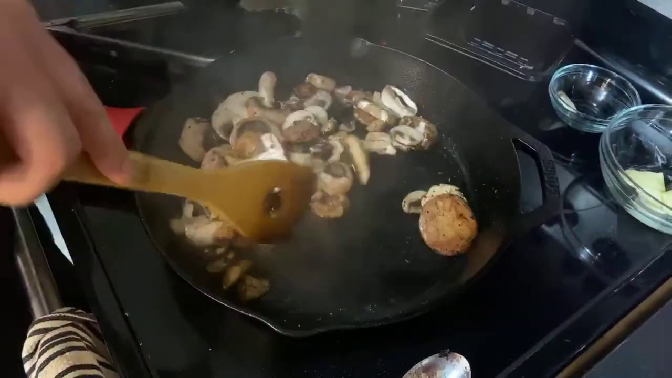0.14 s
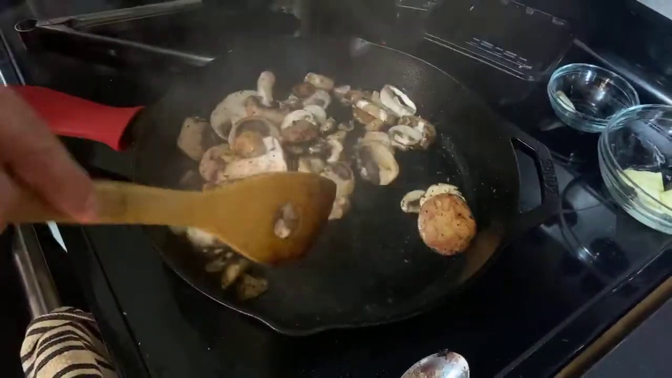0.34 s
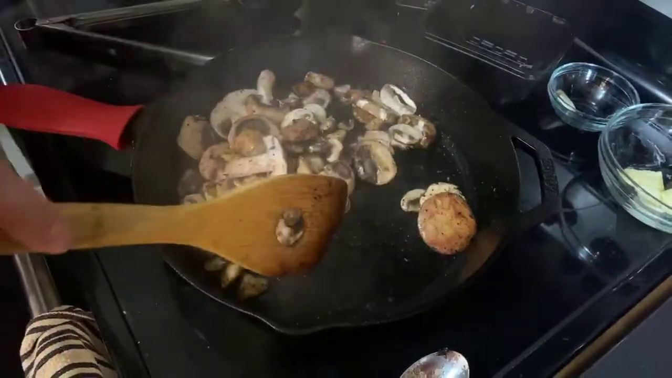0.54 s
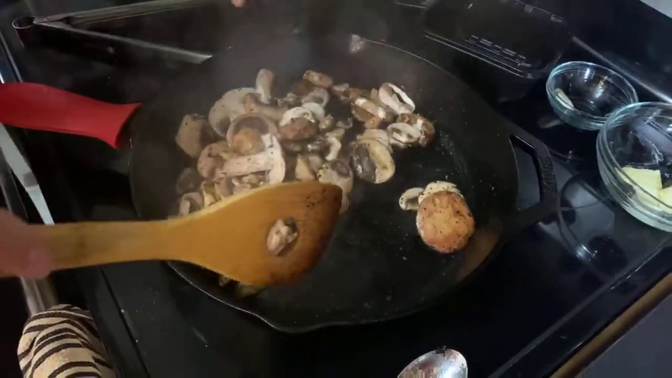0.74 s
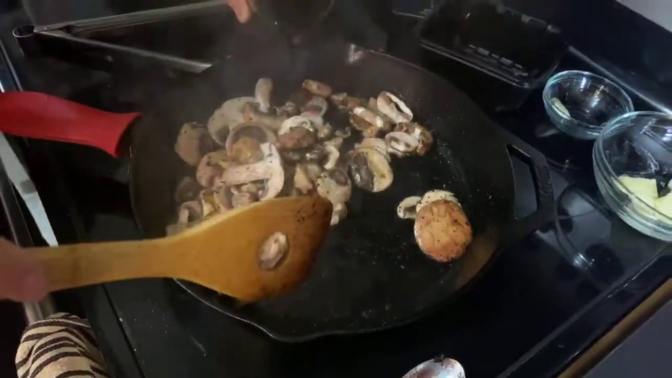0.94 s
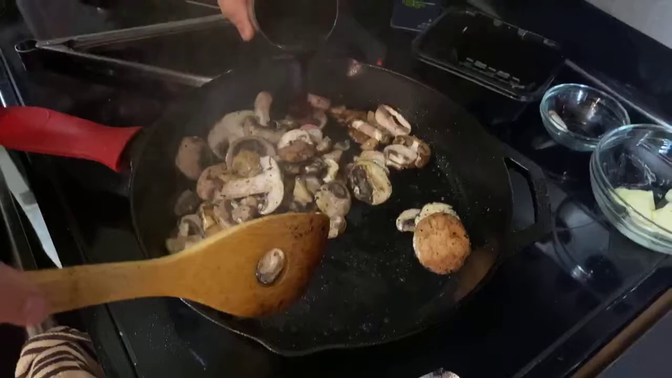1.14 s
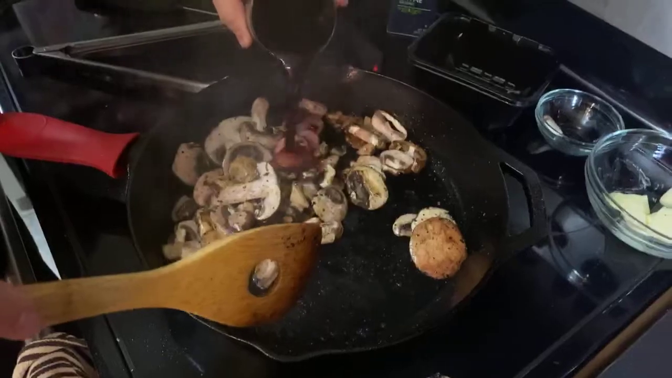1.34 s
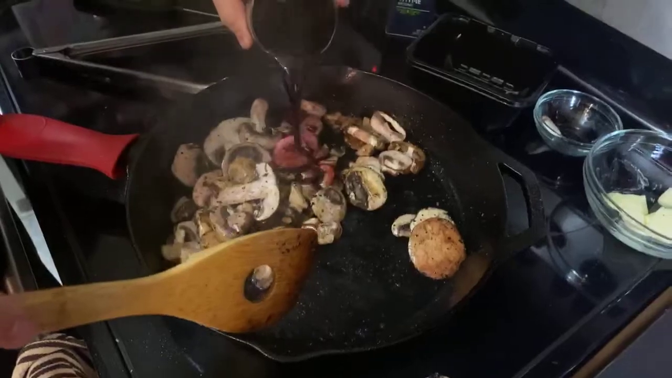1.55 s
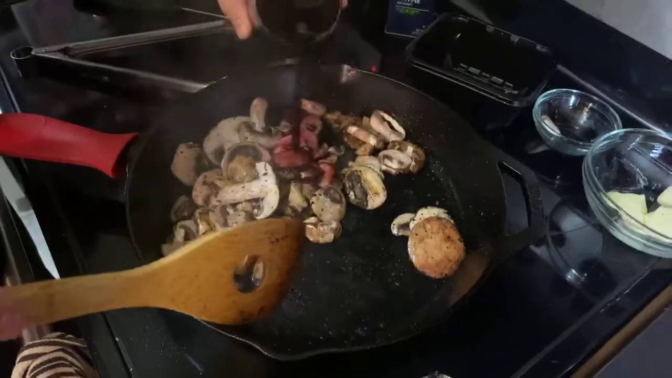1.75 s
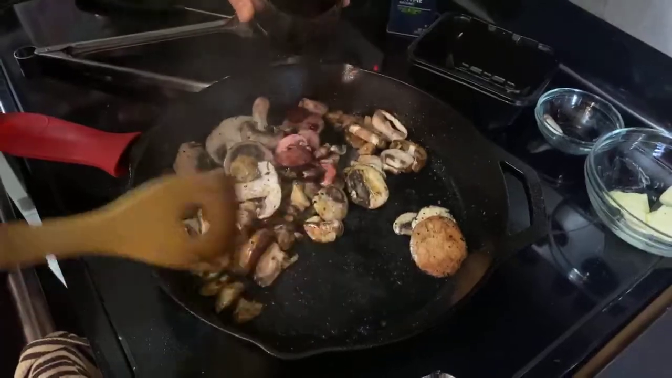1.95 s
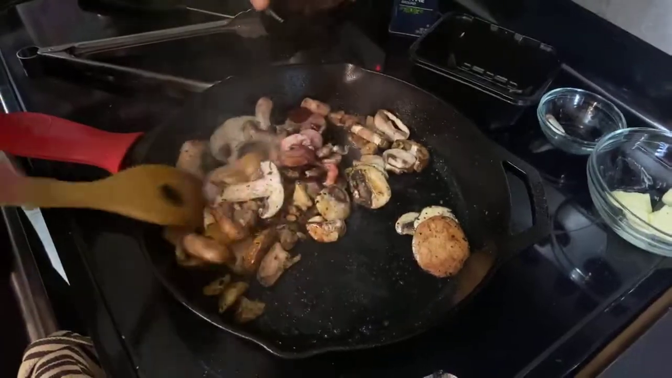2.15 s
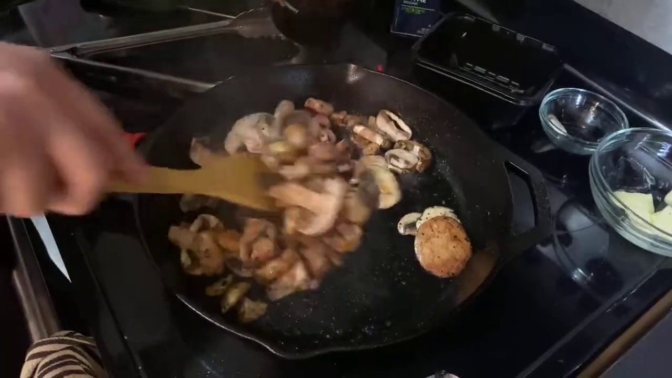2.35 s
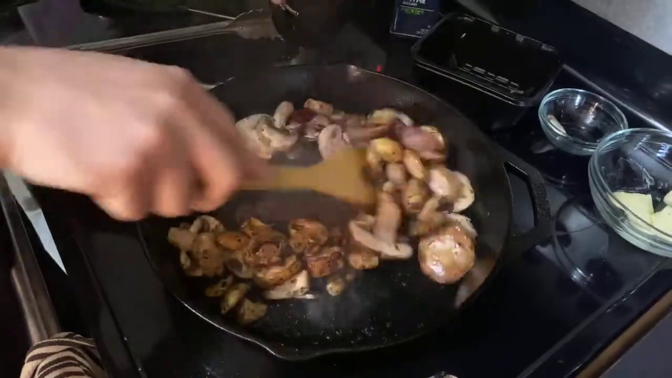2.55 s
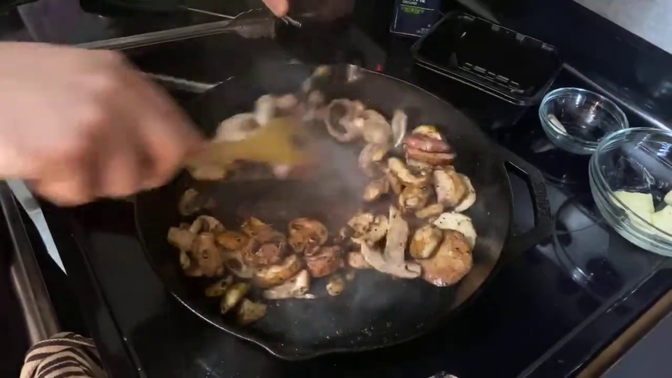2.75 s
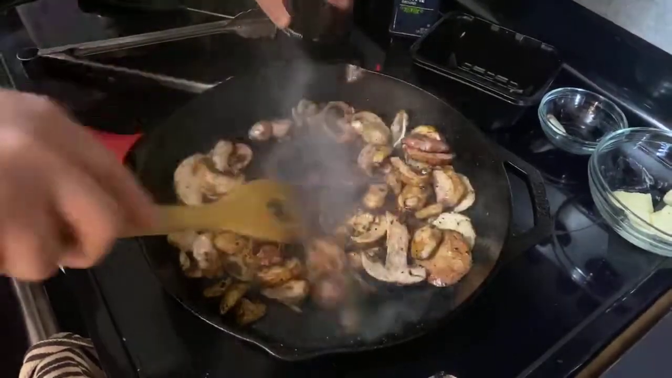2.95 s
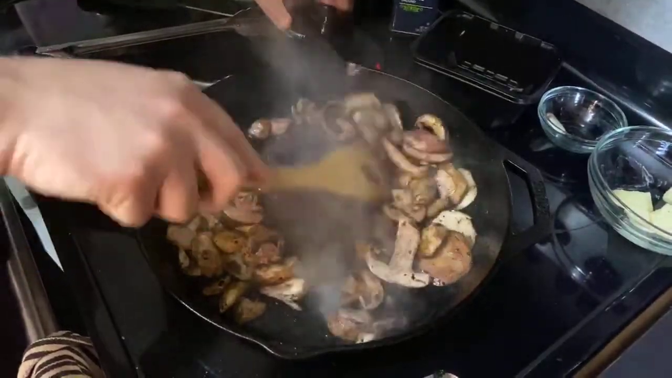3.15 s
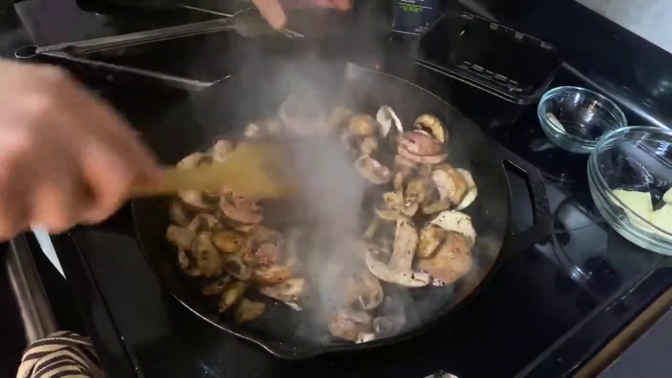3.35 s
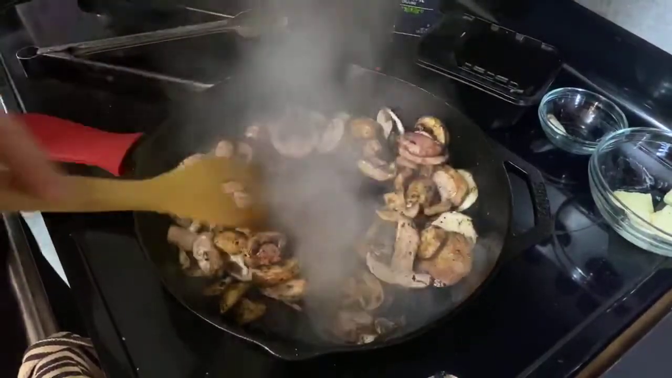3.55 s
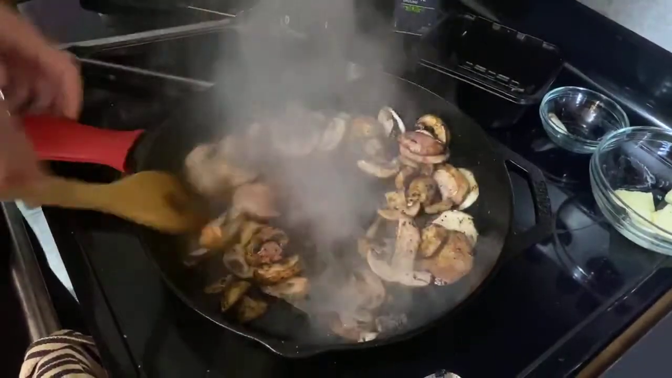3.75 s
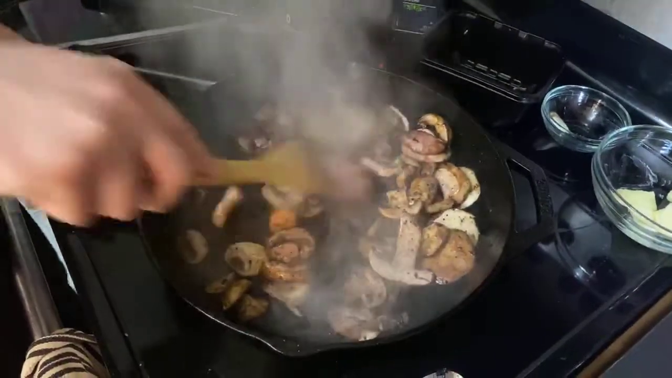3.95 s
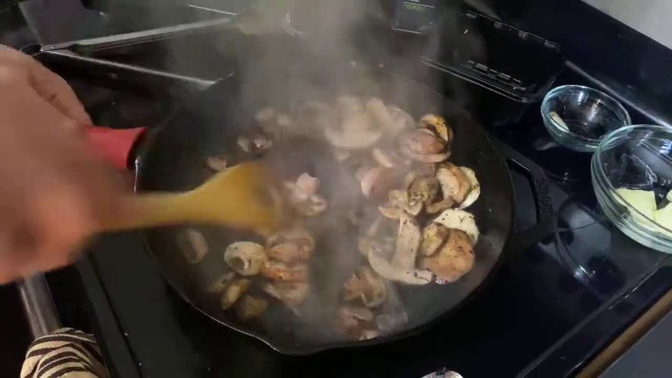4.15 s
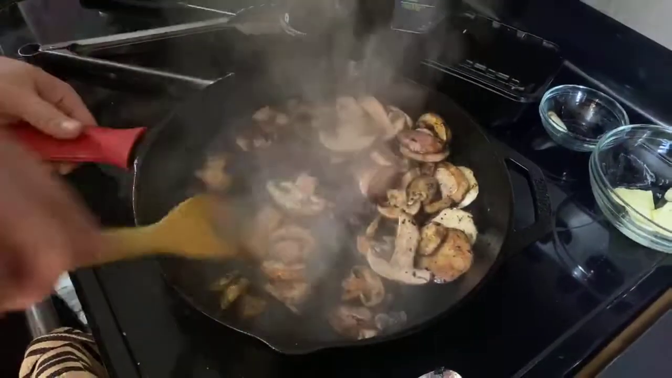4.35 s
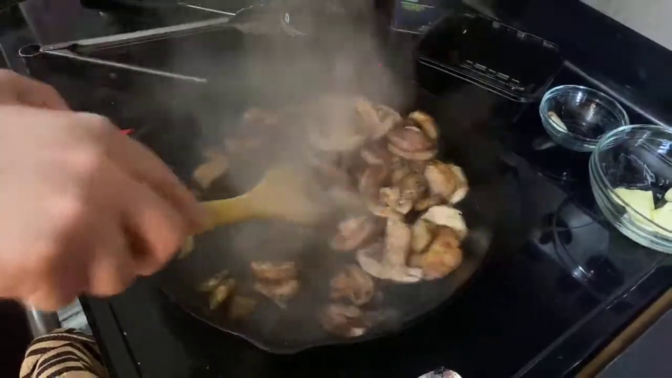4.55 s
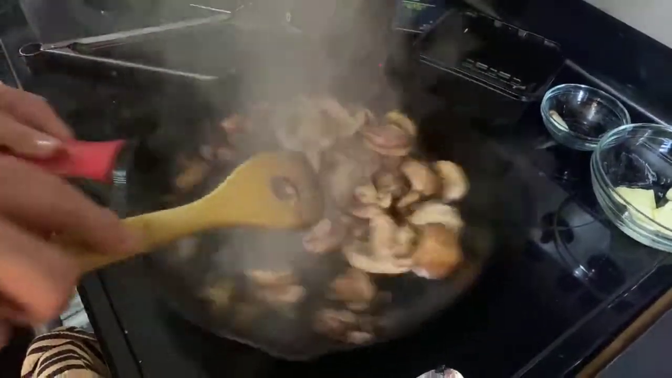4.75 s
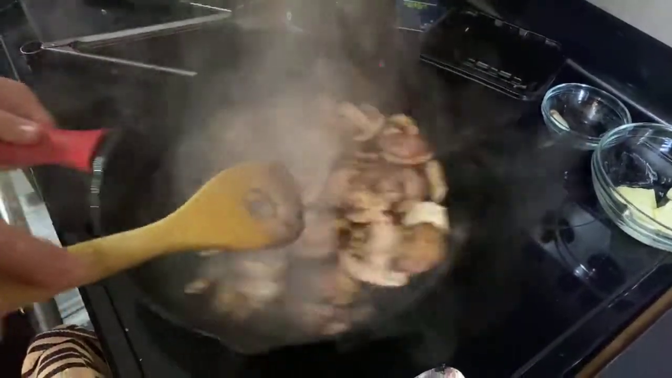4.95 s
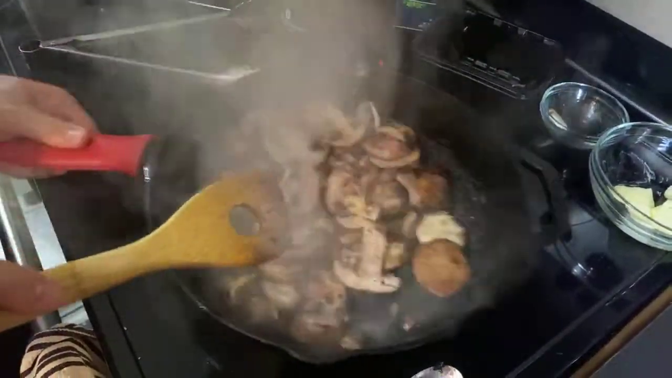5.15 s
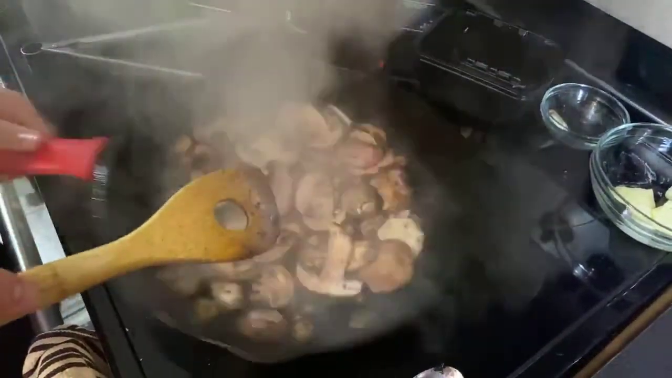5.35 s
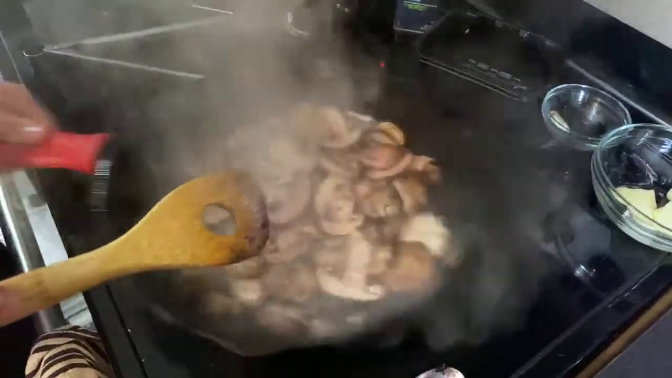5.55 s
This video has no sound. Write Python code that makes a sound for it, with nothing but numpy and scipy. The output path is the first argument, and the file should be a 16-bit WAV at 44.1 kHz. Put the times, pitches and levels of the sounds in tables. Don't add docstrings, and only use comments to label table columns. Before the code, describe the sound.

A quiet, steady fry begins with tiny crackles and hiss, eases slightly, then fills with bubbling liquid from about one and a half seconds. Stirring adds low scraping and wet slosh. A heavy pan knock with a short ring and rattle stands far above the sizzle midway, followed by smaller wooden taps. Close phone microphone in a hard-surfaced kitchen, short dull reflections, slightly thinned treble.

```python
import sys
import numpy as np
from scipy import signal
from scipy.fft import rfft, irfft, next_fast_len
from scipy.io import wavfile
from scipy.ndimage import uniform_filter1d, minimum_filter1d, map_coordinates

SR = 44100
rng = np.random.default_rng(int(sys.argv[2]) if len(sys.argv) > 2 else 0)


def magnitude_from_level(level_db):
    exponent = np.asarray(level_db, float) / 20
    return 10 ** exponent


def dump(signal):
    limited = np.clip(np.atleast_2d(signal).T, -1, 1)
    pcm = np.round(limited * 32767).astype(np.int16)
    wavfile.write(sys.argv[1], SR, pcm)


N = 247401
FRAME = 1024


def unit(x):
    return x / np.sqrt(np.mean(x ** 2) + 1e-20)


def curves(rows):
    s, *cols = np.transpose(rows)
    return [np.interp(np.arange(N) / SR, s, c) for c in cols]


def wobble(rate):
    knots = rng.standard_normal(int(N * rate / SR) + 4)
    return map_coordinates(knots, [np.arange(N) * rate / SR])


def band(x, order, low_hz, high_hz):
    return signal.sosfilt(signal.butter(order, [low_hz, high_hz], "bandpass", fs=SR, output="sos"), x)


def coloured(x, spectrum):
    m, edge = next_fast_len(N + 8 * FRAME), 2 * FRAME
    fade = np.interp(np.arange(N + 2 * edge), [0, edge, N + edge, N + 2 * edge], [0, 1, 1, 0])
    z = rfft(np.pad(x, edge, "reflect") * fade, m)
    flat = z / np.sqrt(np.abs(uniform_filter1d(np.abs(z) ** 2, size=900)) + 1e-12)
    hz, db = np.transpose(spectrum)
    log_hz = np.log(np.fft.rfftfreq(m, 1 / SR) + 1)
    gain = magnitude_from_level(np.interp(log_hz, np.log(hz), db, left=-120, right=-120))
    return unit(irfft(flat * gain, m)[edge:edge + N])


def steam(patchy_db):
    z = signal.stft(rng.standard_normal(N + FRAME), nperseg=512)[2]
    patches = uniform_filter1d(rng.standard_normal(z.shape), size=5, axis=0)
    patches = uniform_filter1d(patches, size=10, axis=1)
    return unit(signal.istft(z * magnitude_from_level(patchy_db * unit(patches)), nperseg=512)[1][:N])


def bubbles(low_hz, high_hz, cycles, rise, spread_db, count, size):
    when, pitch, bigness, life = rng.random((count, 4)).T[:, :, None]
    t = np.arange(size) / SR
    turns = low_hz * (high_hz / low_hz) ** pitch * t
    age = turns / (cycles * (0.54 + 0.43 * life))
    shape = (1 - np.exp(-age / 0.27)) * np.exp(-2.5 * age) * np.hanning(2 * size)[size:]
    tone = np.sin(2 * np.pi * turns * (1 + rise * age))
    pops = magnitude_from_level(-spread_db * np.log(1.002 - bigness)) * shape * tone
    at = (when * N).astype(int) + np.arange(size)
    return unit(np.bincount(at.ravel(), pops.ravel(), N + size)[:N])


def boil(pops, spectrum, pop_db, patchy_db):
    even_pops = coloured(pops, [(20, 0), (20000, 0)])
    return coloured(magnitude_from_level(pop_db) * even_pops + steam(patchy_db), spectrum)


# frequency in Hz, level in dB per Hz.
LARGE = [(600, -27), (850, -10.5), (1150, -0.5), (1400, -3), (1750, -1), (2100, -3.5), (2600, -49.5)]
MIDDLE = [(1400, -42.5), (1800, -8), (2050, -3.5), (2380, 0), (2750, -2), (2980, -6), (3250, -1),
          (3600, -8), (4400, -41)]
SMALL = [(2600, -17.5), (3300, -11), (3800, -4.5), (4800, -3.5), (5700, -1.5), (6400, -4), (7700, -7.5),
         (8400, -7.5), (9300, -14), (11000, -37.5)]
SPIT = [(6500, -28.5), (7900, -6.5), (8600, -2), (9500, -1), (10700, -3), (12900, -1.5), (14200, -3.5),
        (15600, -2.5), (17000, -28.5)]
# time in seconds, level of the small bubbles in dB.
BOIL = [(0.0, -33), (0.41, -35.5), (1.23, -36.5), (1.44, -32.5), (1.69, -30), (2.05, -28.5), (2.75, -26.5),
        (3.72, -26.5), (4.55, -28), (4.84, -28.5), (5.22, -26.5), (5.61, -27)]
SMALL_DB, LARGE_DB, MIDDLE_DB, SPIT_DB = 0, -12, -6.5, -2.5
SMOTHER_DB, POOL_FOAM_DB, POOL_GURGLE_DB = -4, 1.5, 1.6
POOL_DEEPENS, DRY_THINS = 0.4, -0.23


def frying():
    boil_db, pool = curves(BOIL)[0], wine()
    large_db = boil_db + LARGE_DB + POOL_GURGLE_DB * pool
    middle_db = boil_db + MIDDLE_DB + POOL_FOAM_DB * pool + foam_db()
    small_db = boil_db + SMALL_DB
    spit_db = boil_db + SPIT_DB + SMOTHER_DB * pool
    surge = wobble(18)

    large = bubbles(667.0, 2550, cycles=10.4, rise=0.087, spread_db=2.5, count=4000, size=500)
    large = boil(large, LARGE, pop_db=-6.5, patchy_db=0.1)
    middle = bubbles(1504, 4330, cycles=12.2, rise=0.054, spread_db=2.0, count=7000, size=300)
    middle = boil(middle, MIDDLE, pop_db=-4.5, patchy_db=1.14)
    small = bubbles(2710, 10000, cycles=11.1, rise=0.25, spread_db=1.5, count=20000, size=110)
    small = boil(small, SMALL, pop_db=-4.5, patchy_db=1.76)
    spit = bubbles(5000, 15000, cycles=2.9, rise=.05, spread_db=0.5, count=50000, size=24)
    spit = boil(spit, SPIT, pop_db=-7.5, patchy_db=0.8)

    large *= magnitude_from_level(large_db + 0.33 * surge + 0.32 * wobble(20))
    middle *= magnitude_from_level(middle_db + 0.32 * surge + 0.52 * wobble(15))
    fattest = band(small, 1, 2900, 4300)
    small = small + (DRY_THINS + POOL_DEEPENS * pool) * fattest
    small *= magnitude_from_level(small_db + 0.29 * surge + 0.089 * wobble(16))
    spit *= magnitude_from_level(spit_db + 0.36 * surge + 0.24 * wobble(20))
    return hollow(large + middle + small + spit)


POUR_S, POURED_S, SPREAD_S, SPREAD_TAKES_S, LEFT_SHARE, DRY_S = 1, 1.9, 2.2, .22, 0.45, 4.7


def wine():
    spread_end_s = SPREAD_S + SPREAD_TAKES_S
    return curves([(0, 0), (POUR_S, 0), (POURED_S, 1), (SPREAD_S, 1), (spread_end_s, LEFT_SHARE), (DRY_S, 0)])[0]


# peak in seconds, gain of the middle bubbles in dB.
FOAM = [
    (.85, 2.4),
    (1.4, 1),
    (2.56, 3.5),
    (4.2, 0.4),
    (5.2, -0.1),
]
FOAM_RISE_S, FOAM_FALL_S = 0.18, 0.16


def foam_db():
    t = np.arange(N) / SR
    return sum(db * np.exp(-((t - s) / np.where(t < s, FOAM_RISE_S, FOAM_FALL_S)) ** 2) for s, db in FOAM)


# time in seconds, stirring effort 0-1.
STIR = [(0, .3), (.8, .05), (1.95, .15), (2.2, 0.4), (2.9, .5), (3.2, 0.6), (3.45, .6), (3.85, .95),
        (4.15, .6), (4.75, .95), (5.61, 0.8)]
# frequency in Hz, level in dB per Hz.
DRAG = [(20, -60), (40, -17), (70, -8), (110, -0.5), (160, -2), (230, -5), (330, -3.5), (500, -32)]
SLOSH = [(200, -36), (340, -2), (470, -4), (570, 0), (660, -6.5), (790, 2.5), (950, -12.5), (1300, -1.5)]
DRAG_REST_DB, DRAG_EFFORT_DB = -61.5, 9.0
SLOSH_DRY_DB, SLOSH_WET_DB, SLOSH_EFFORT_DB, WETTING_S, WET_S = -59, 8.5, 0.7, 1.66, 2.05


def stirring():
    effort = curves(STIR)[0]
    wet = curves([(WETTING_S, 0), (WET_S, 1)])[0]
    drag_db = DRAG_REST_DB + DRAG_EFFORT_DB * effort
    slosh_db = SLOSH_DRY_DB + SLOSH_WET_DB * wet + SLOSH_EFFORT_DB * effort
    judder = wobble(22.04)
    drag = coloured(steam(1.2), DRAG) * magnitude_from_level(drag_db + 1.6 * judder)
    slosh = bubbles(268, 1110, cycles=4.7, rise=0.26, spread_db=1.5, count=1500, size=700)
    slosh = boil(slosh, SLOSH, pop_db=-9, patchy_db=1.5)
    return drag + slosh * magnitude_from_level(slosh_db + 0.78 * judder)


def ring(modes, t, attack):
    tones = 0
    for hz, db, t60 in modes:
        tones = tones + magnitude_from_level(db + rng.normal(0, 1.1) - 60 * t / t60) * np.sin(2 * np.pi * hz * t)
    return tones * (1 - np.exp(-t / attack))


# start in seconds, thud peak in dB, wood tick and rattle in dB over the thud.
KNOCKS = [
    (2.187, -39, -14, -8),
    (2.98, -7.5, -11, -10.5),
    (3.028, -29, -10, -0.5),
    (3.738, -34.5, -12, -12),
    (3.792, -29.5, -10, -13),
    (3.96, -34.5, -12, 1),
    (4.258, -31, 2, 0.5),
    (2.977, -40, 19.5, -10),
    (3.097, -33, -14, -15.5),
]
# frequency in Hz, level in dB, t60 in seconds.
PAN = [(162.4, -3.5, 0.14), (181.5, -3, 0.06), (215, 1, 0.055), (249, -4, 0.05), (341, -11.5, 0.086)]
BLADE = [(1150, -13, 0.032), (1284, 0.5, 0.038), (1800, -6, 0.065), (2010, -3, .06), (2250, -6, .07),
         (5100, 1, 0.025), (5600, -2.5, .02)]


def knocks():
    out, t = np.zeros(N + SR), np.arange(SR // 3) / SR
    late = np.maximum(t - .004, 0)
    for s, db, tick_db, rattle_db in KNOCKS:
        rattle = unit(band(rng.standard_normal(len(t)), 2, 200, 900))
        rattle *= magnitude_from_level(-60 * late / 0.22) * (1 - np.exp(-late / 0.0079))
        thud = ring(PAN, late, attack=0.0058) + magnitude_from_level(rattle_db) * rattle
        tick = ring(BLADE, t, attack=0.00049)
        crack = band(rng.standard_normal(len(t)), 2, 900, 6500)
        tick = tick + 2.5 * magnitude_from_level(-60 * t / 0.051) * crack
        out[round(s * SR):][:len(t)] += magnitude_from_level(db - 6.5) * thud + magnitude_from_level(db + tick_db - 3.5) * tick
    return signal.sosfilt(signal.butter(2, 90, "highpass", fs=SR, output="sos"), out[:N])


# centre in Hz, width in Hz, lift in dB.
HOLLOW = [(1136, 23, -2), (1636, 44, 2), (2326, 50, 2.5), (2440, 48, 0), (3270, 70, -3.5), (4720, 220, 1),
          (5450, 200, 0.8)]


def hollow(x):
    m = next_fast_len(N + 8192)
    hz = np.fft.rfftfreq(m, 1 / SR)
    lift_db = sum(db / (1 + (2 * (hz - centre) / width) ** 2) for centre, width, db in HOLLOW)
    return irfft(rfft(x, m) * magnitude_from_level(lift_db), m)[:N]


def kitchen(x, t60, wet_db):
    t = np.arange(SR // 3) / SR
    tail = rng.standard_normal(len(t)) * magnitude_from_level(-60 * t / t60) * (t > .002)
    dull = band(tail / np.linalg.norm(tail), 2, 150, 2800)
    return x + magnitude_from_level(wet_db) * signal.fftconvolve(x, dull)[:N]


END_DIP_S, END_DIP_DB = .08, -2


def scene():
    pan = kitchen(frying() + stirring(), t60=0.09, wet_db=-10.5)
    pan = pan + kitchen(knocks(), t60=0.14, wet_db=-10.0)
    dip_db, = curves([(N / SR - END_DIP_S, 0), (N / SR, END_DIP_DB)])
    return np.tile(pan * magnitude_from_level(dip_db), (2, 1))


# frequency in Hz, share of cells 0-1.
THINNED = [(6000, 0), (7600, .012), (8800, .004), (10800, .012), (12400, .003), (13400, .008), (14700, .04),
           (15600, .01)]


def dropouts(x, top_hz):
    hz, _, z = signal.stft(np.pad(x, (0, FRAME)), SR, nperseg=FRAME)
    cell = uniform_filter1d(uniform_filter1d(np.abs(z) ** 2, size=5, axis=0), size=3, axis=1)
    usual = uniform_filter1d(cell, size=40, axis=1) ** .65 * cell.mean(0) ** .35
    rank = np.argsort(np.argsort(cell / usual, axis=1), axis=1) / cell.shape[1]
    mute = 1. * (rank < np.interp(hz, *np.transpose(THINNED))[:, None])
    mute = -minimum_filter1d(minimum_filter1d(-mute, size=3, axis=0), size=2, axis=1)
    return signal.istft(z * magnitude_from_level(-18 * mute) * (hz < top_hz)[:, None], SR, nperseg=FRAME)[1][:N]


# time in seconds, band centre in Hz.
FILLS = [(0.24, 11700), (0.24, 7600), (1.055, 12400), (2.284, 5700), (2.308, 8300), (2.308, 11700),
         (2.308, 14100), (2.425, 6300), (2.749, 6950), (2.888, 5900), (2.888, 7400), (2.937, 5700),
         (3.073, 4950), (3.26, 7450), (3.26, 8800), (3.77, 13750), (3.982, 6300), (4.213, 5000),
         (4.213, 9600), (4.419, 15000), (4.465, 14450), (4.791, 11700), (5.186, 7600), (5.186, 5550),
         (5.35, 4950), (5.35, 6900)]
FILL_WIDTH_HZ, FILL_DB = 1380, -4.5
GRID = 396


def fills(x):
    side, n = np.zeros(N + 4096), np.arange(2 * FRAME)
    window = np.sin(np.pi * (n + .5) / (2 * FRAME))
    for s, centre_hz in FILLS:
        edges_hz = centre_hz + np.array([-.5, .5]) * FILL_WIDTH_HZ
        low, high = np.round(edges_hz * 2 * FRAME / SR)
        pitch = np.arange(low, high)[:, None] + .5
        lines = np.cos(np.pi / FRAME * (n + .5 + FRAME / 2) * pitch) * window
        start = GRID + FRAME * (round((s * SR - GRID) / FRAME) - 1)
        strength = np.std(lines @ x[start:][:2 * FRAME]) * 2 / FRAME
        side[start:][:2 * FRAME] += magnitude_from_level(FILL_DB) * strength * rng.standard_normal(200)[:len(lines)] @ lines
    return side[:N] * [[1], [-1]]


def top_cut(x):
    return signal.sosfilt(signal.butter(12, 16970, fs=SR, output="sos"), x)


def record(dry):
    mix = dropouts(dry[0], top_hz=15740) + fills(dry[0])
    return top_cut(mix)


dry = scene()
out = record(dry)
dump(out)
```